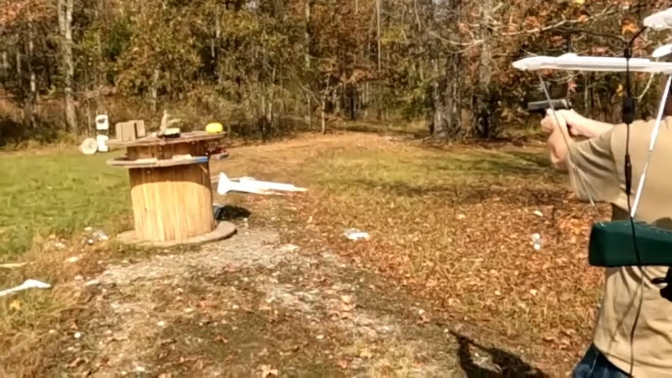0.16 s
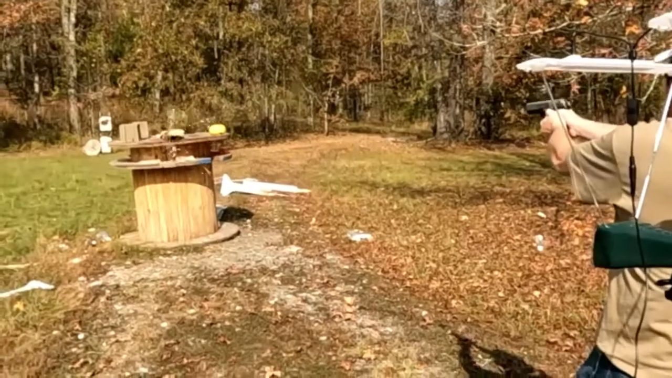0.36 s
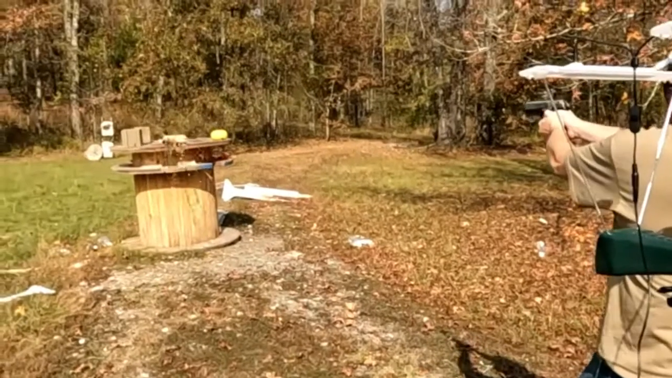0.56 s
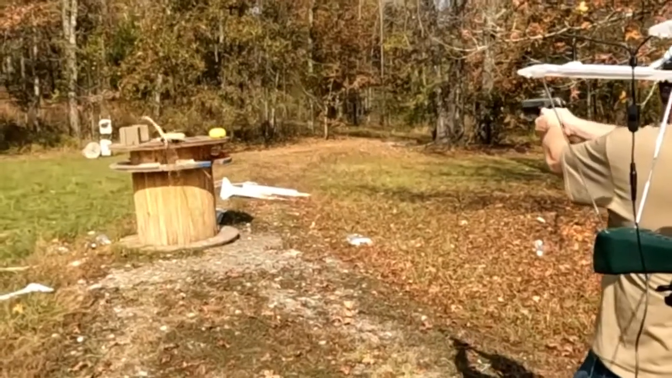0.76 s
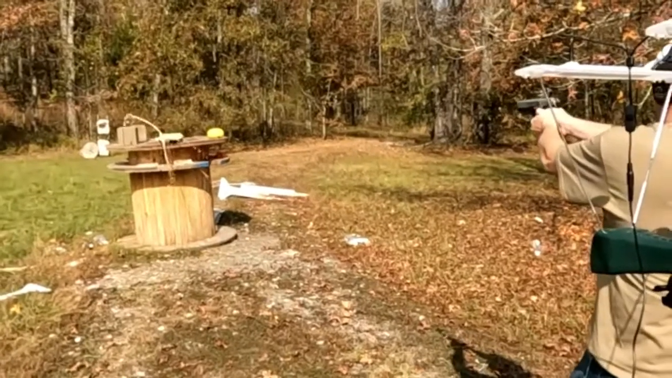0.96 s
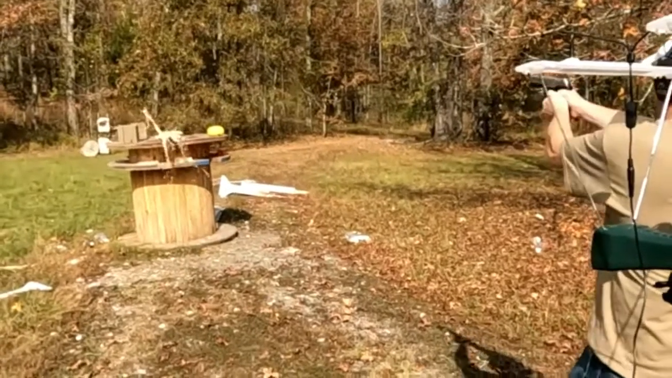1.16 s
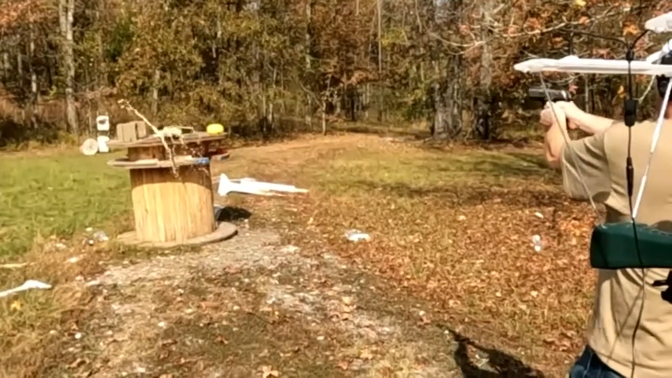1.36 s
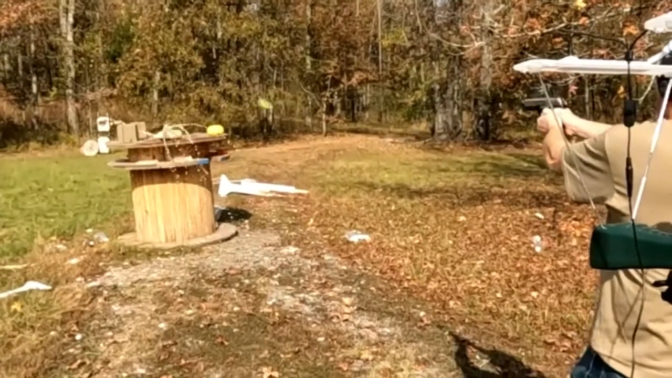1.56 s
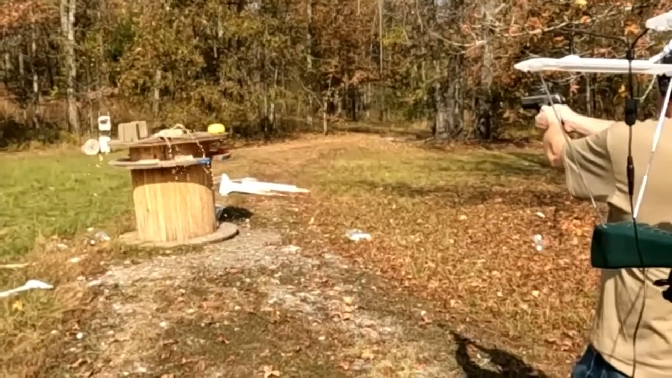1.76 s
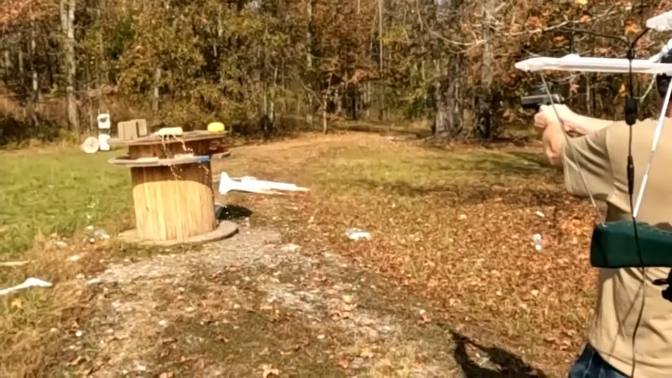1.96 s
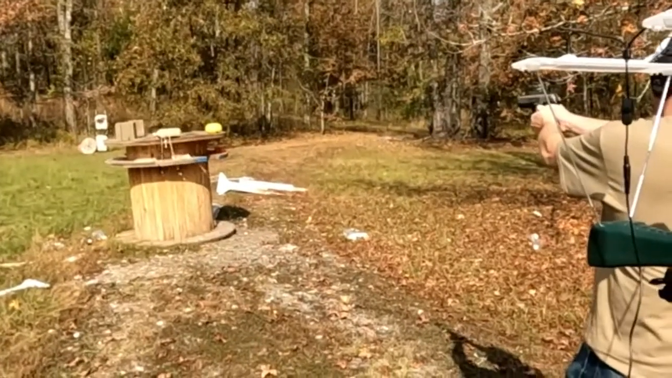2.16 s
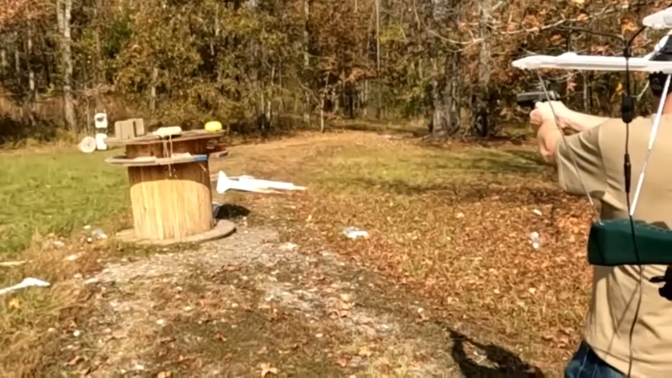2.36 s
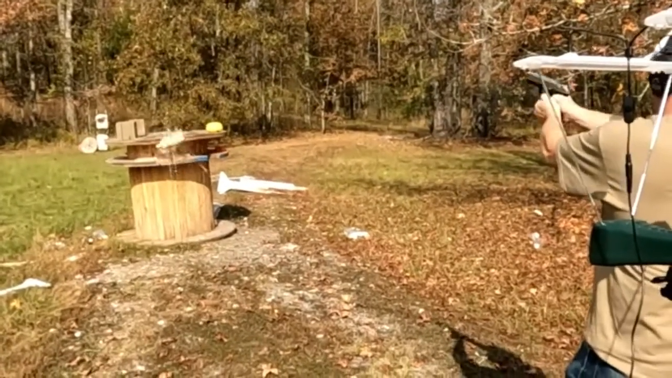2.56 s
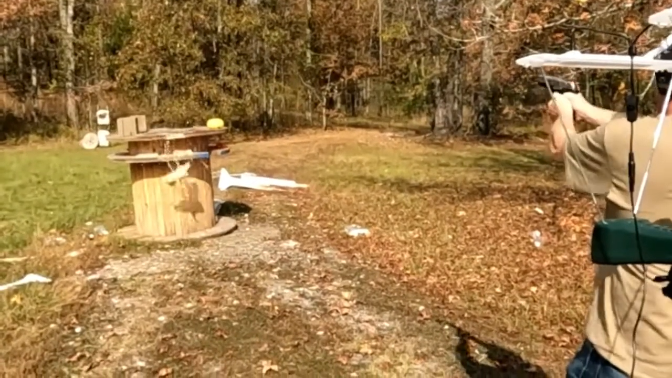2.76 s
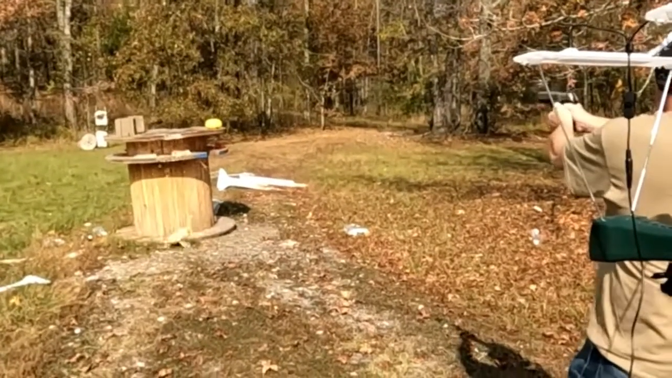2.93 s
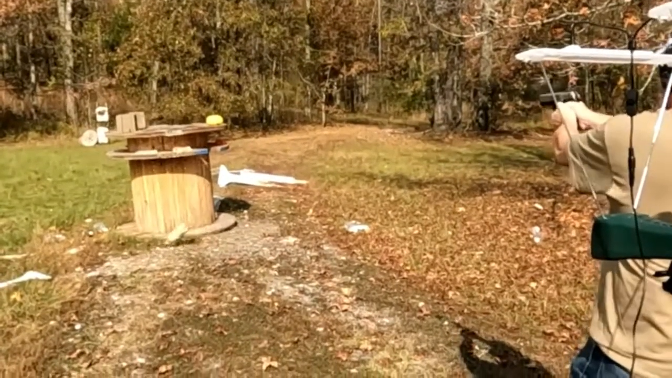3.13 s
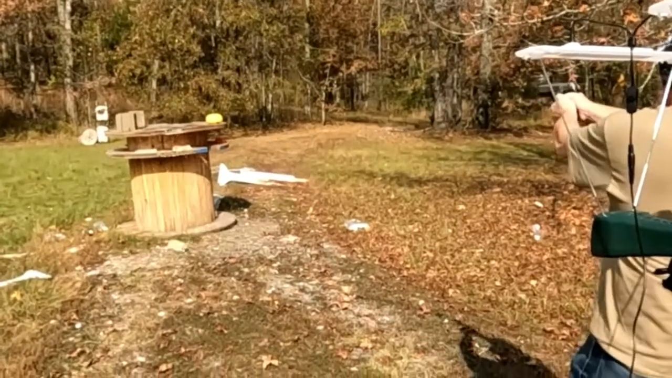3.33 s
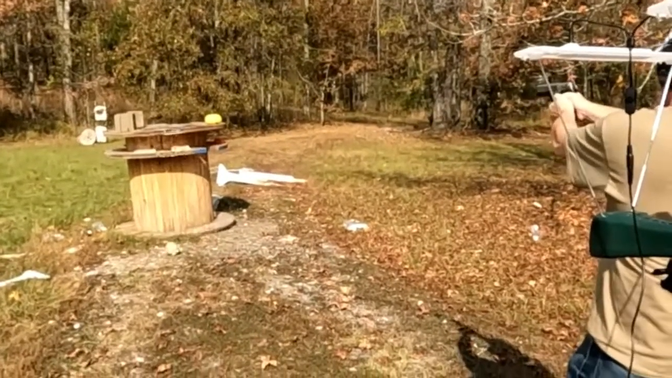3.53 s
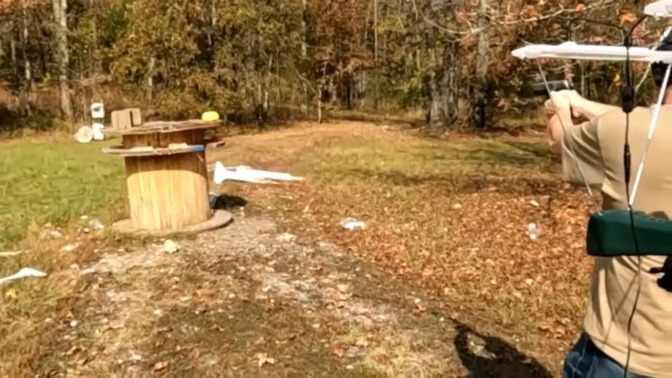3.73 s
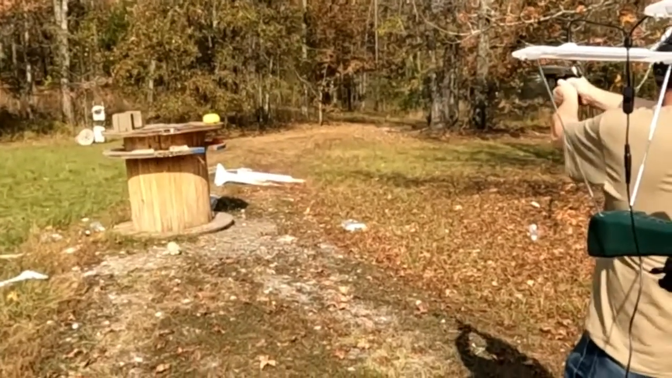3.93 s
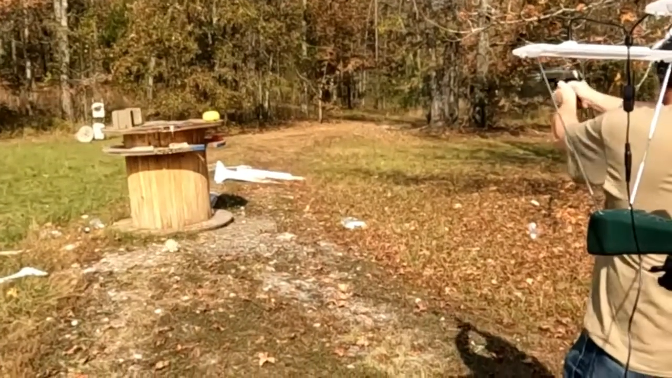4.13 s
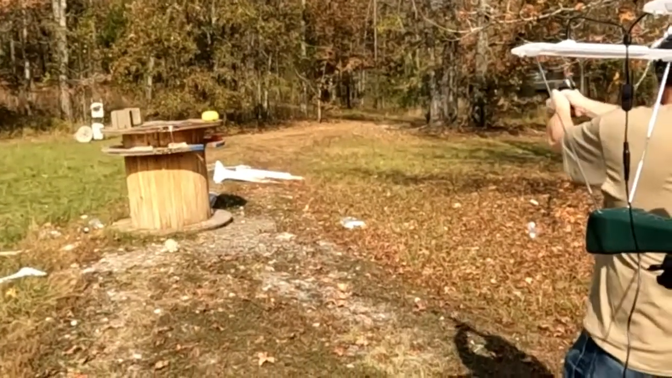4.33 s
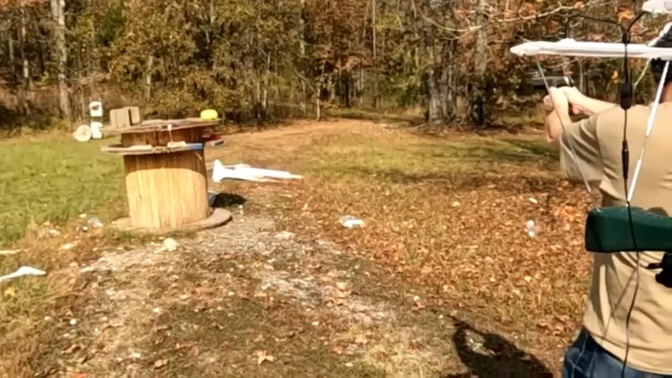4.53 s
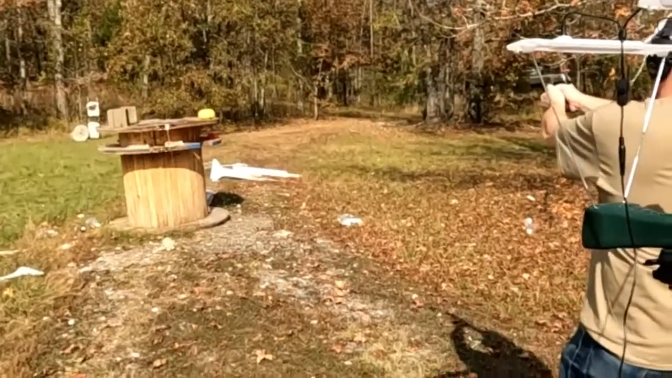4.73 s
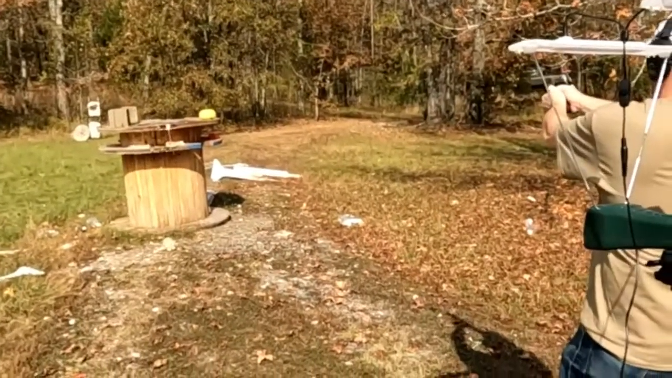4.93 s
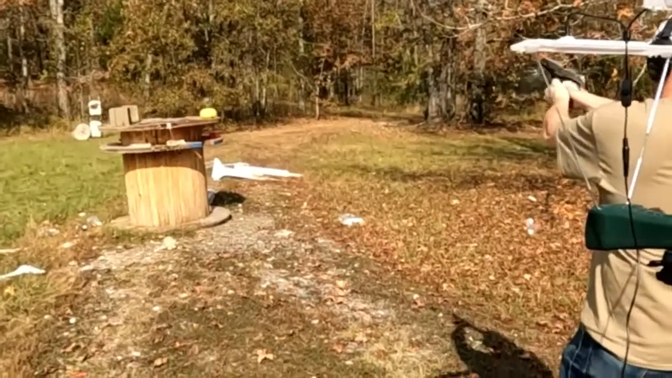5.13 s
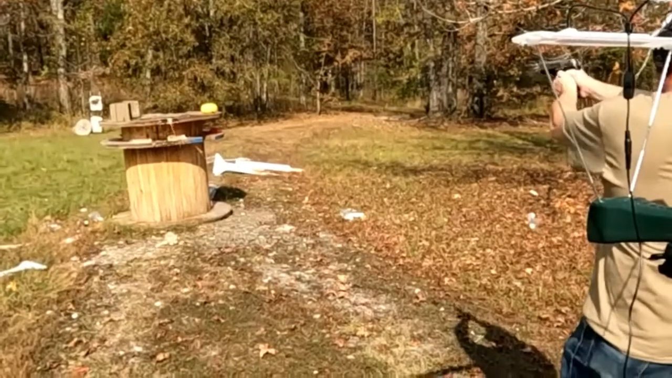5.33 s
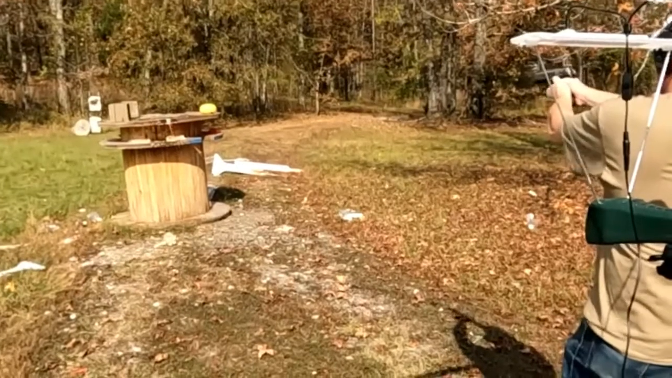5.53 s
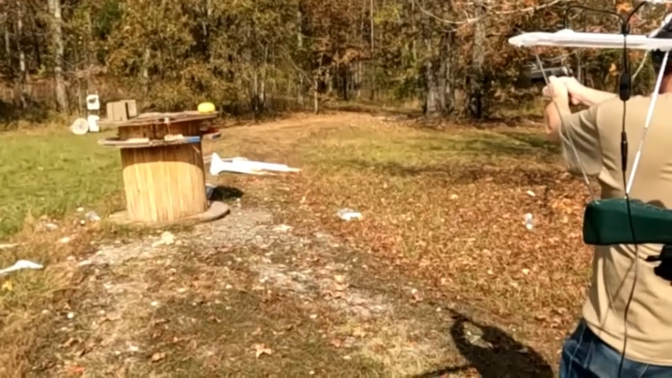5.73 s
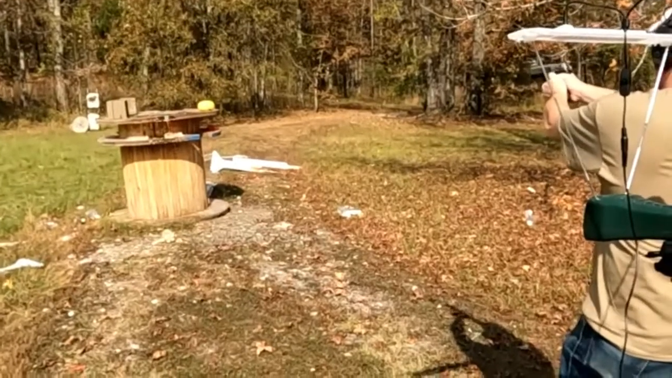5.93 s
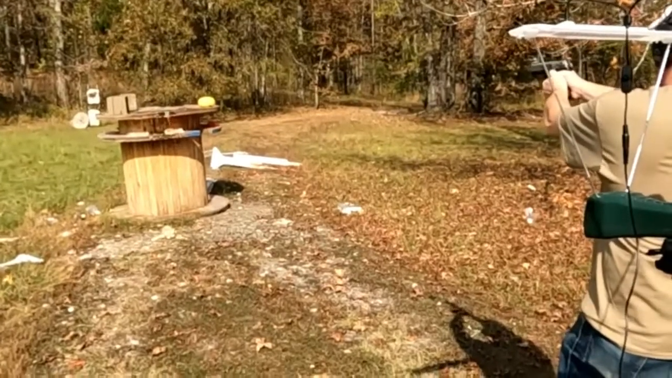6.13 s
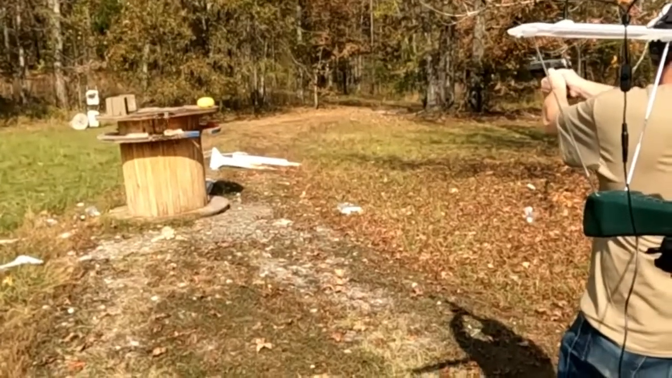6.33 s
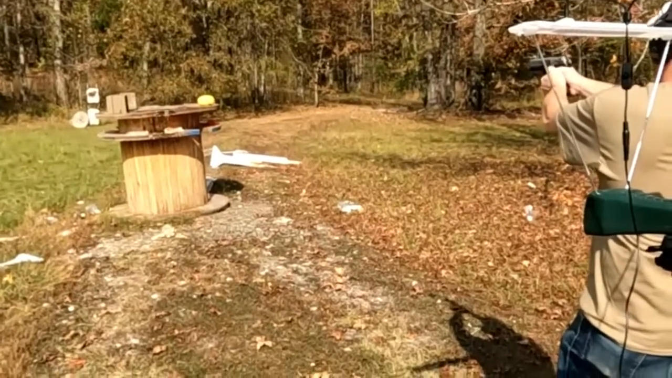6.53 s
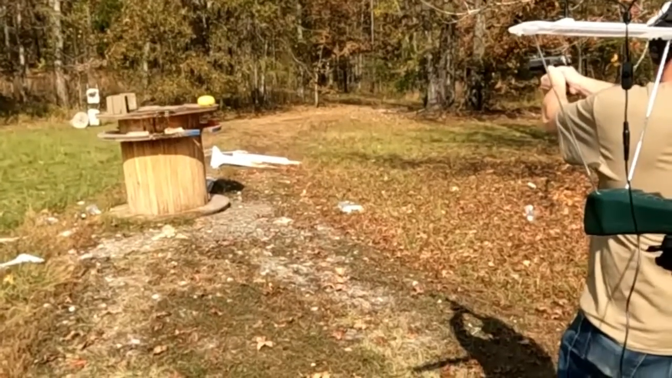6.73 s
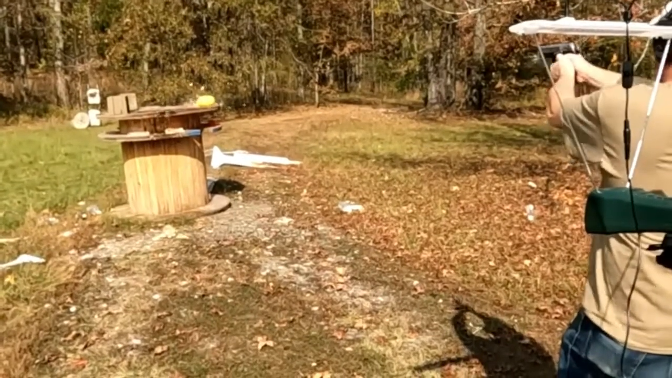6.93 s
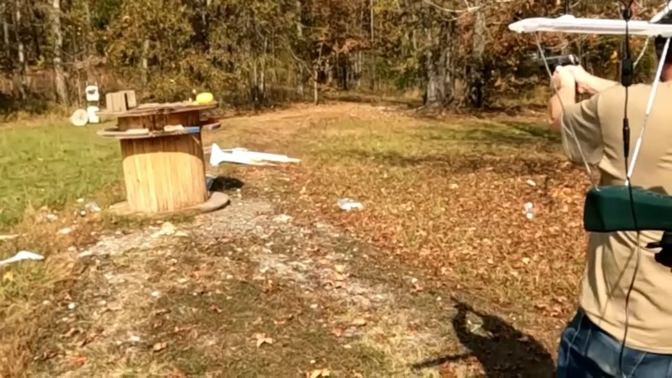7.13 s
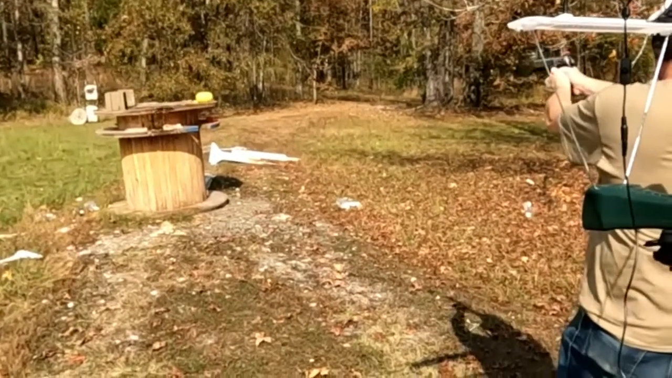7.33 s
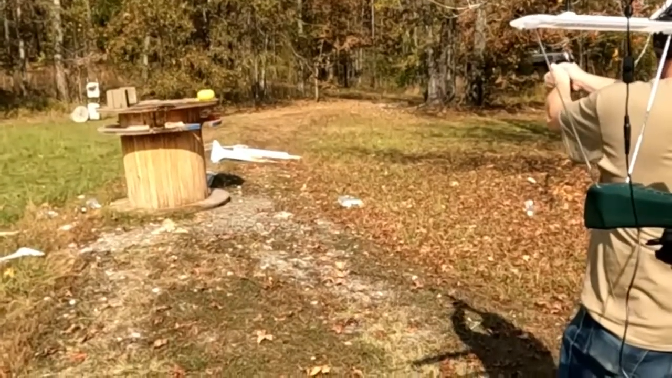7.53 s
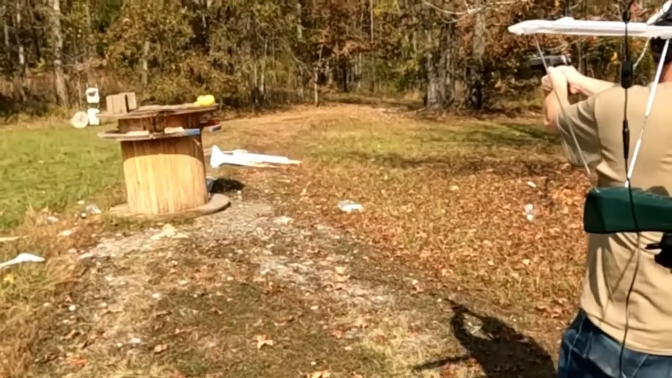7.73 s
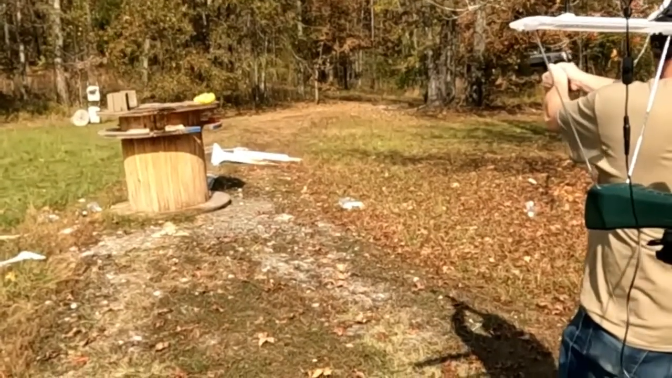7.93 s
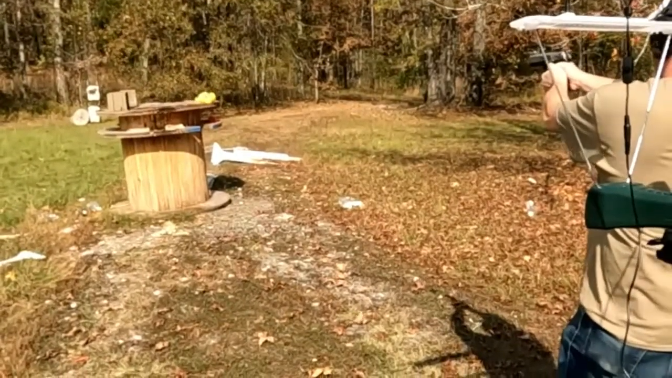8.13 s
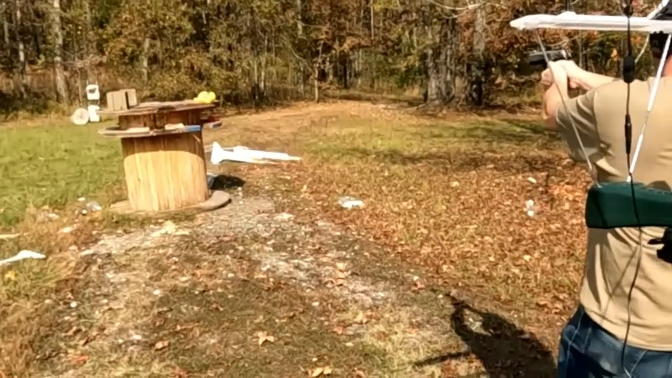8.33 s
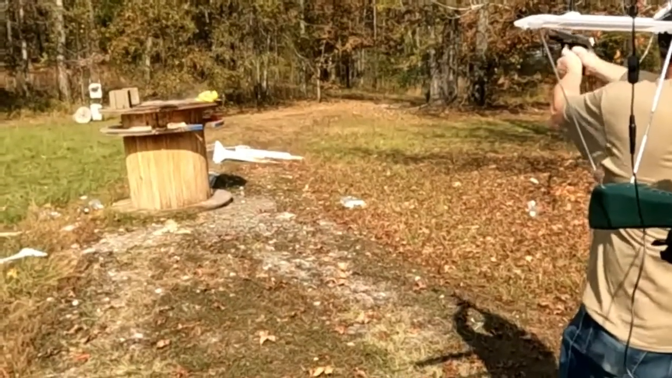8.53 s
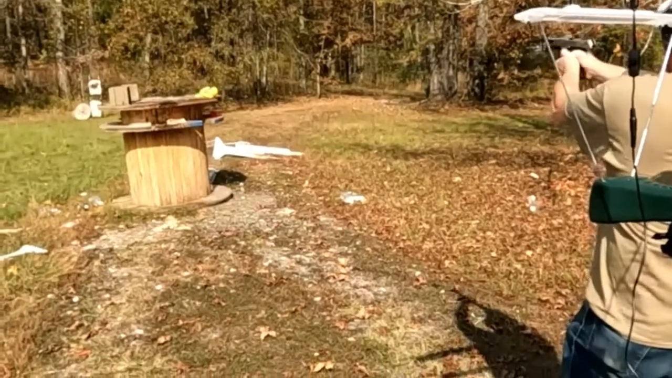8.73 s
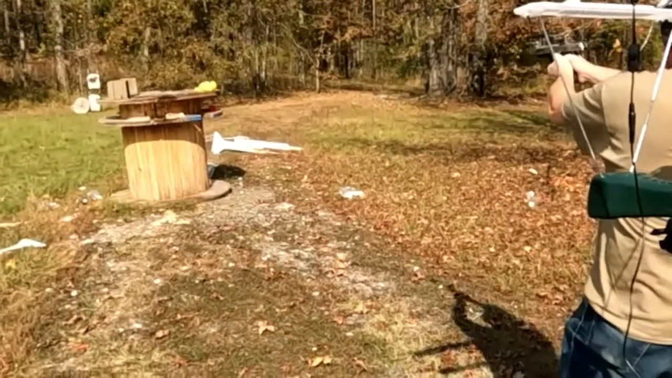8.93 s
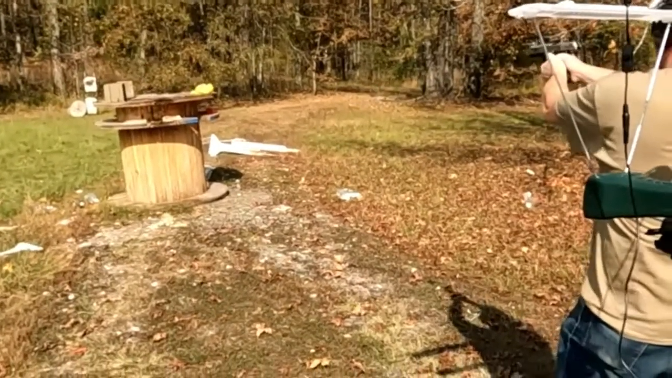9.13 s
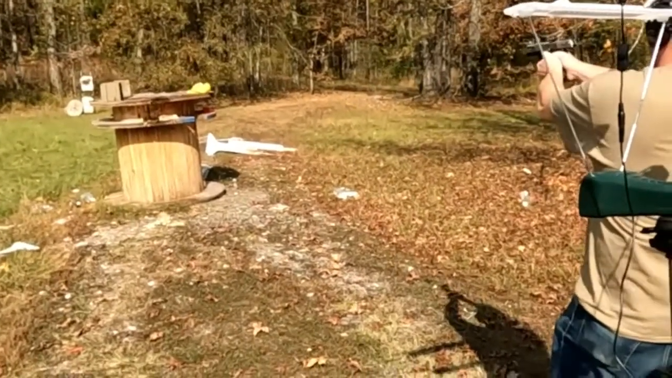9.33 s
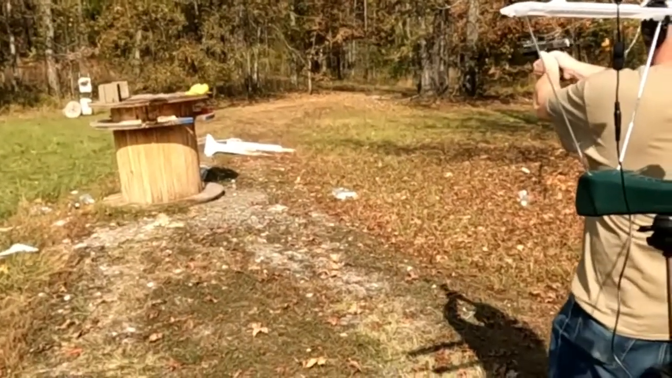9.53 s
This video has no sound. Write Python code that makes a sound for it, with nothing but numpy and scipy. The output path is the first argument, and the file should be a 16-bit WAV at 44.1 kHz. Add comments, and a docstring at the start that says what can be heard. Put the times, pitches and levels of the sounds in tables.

```python
"""The roll of an earlier shot is already fading in the woods; then a pistol fires six times at an easy pace.
It stands to the right of a two-port microphone on an outdoor range ringed by trees.
A buzzing noise and a tone swell up to each crack and low thump, which are causal pulses from spectra.
Delayed pulses give a near wooden spool and a sharp far slap; scattered noise taps give litter and woods.
Noise bursts tick and thud in the pauses, over shaped noise for hush, light wind, leaves and insects."""
import sys
import numpy as np
from scipy import signal
from scipy.fft import rfft, irfft, next_fast_len
from scipy.io import wavfile
from scipy.ndimage import uniform_filter1d

SR = 44100
rng = np.random.default_rng(int(sys.argv[2]) if len(sys.argv) > 2 else 0)


def digitize_waveform(pressure):
    """Quantize a signal to 16-bit integers and store it at the path in sys.argv[1].

    Rows of a 2-D input are taken as channels; values are limited to [-1, 1].
    """
    field = np.atleast_2d(pressure).T
    bounded = np.clip(field, -1, 1)
    quanta = np.round(bounded * 32767).astype(np.int16)
    wavfile.write(sys.argv[1], SR, quanta)


N = 423002


def amp(db):
    """Turns decibels into an amplitude factor."""
    return 10 ** (np.asarray(db) / 20)


def unit(x):
    """Scales x to rms 1."""
    return x / np.sqrt(np.mean(x ** 2) + 1e-20)


def spectrum(points, hz):
    """Amplitude at hz, interpolated in dB over log frequency."""
    f, db = np.transpose(points)
    return amp(np.interp(np.log(hz + 1), np.log(f), db))


def add(mix, s, sound):
    """Mixes a sound into both channels at time s, dropping what falls outside."""
    start = round(s * SR)
    sound = sound[..., max(-start, 0):]
    part = mix[:, max(start, 0):][:, :sound.shape[-1]]
    part += sound[..., :part.shape[1]]


def colour(x, points):
    """Filters x by a spectrum."""
    size = next_fast_len(len(x), True)
    gain = spectrum(points, np.fft.rfftfreq(size, 1 / SR))
    return irfft(rfft(x, size) * gain, size)[:len(x)]


def noise(size):
    """White noise of rms 1."""
    return rng.standard_normal(size)


def pulse(points, lag=0., knee_hz=400, size=8192):
    """A causal pressure pulse of peak 1 whose lows trail its highs by up to lag seconds."""
    hz = np.fft.rfftfreq(size, 1 / SR)
    log_gain = np.log(spectrum(points, abs(np.fft.fftfreq(size, 1 / SR))))
    # the Hilbert transform of the log gain gives the minimum phase
    response = np.exp(np.conj(signal.hilbert(log_gain)))[:len(hz)]
    trailing = np.exp(-2j * np.pi * lag * knee_hz * np.arctan(hz / knee_hz))
    wave = irfft(response * trailing)[:size // 2]
    return wave / abs(wave).max()


def step(t, rise_s):
    """A smooth rise from 0 to 1 around t = 0."""
    return .5 + .5 * np.tanh(t / rise_s)


def wander(size, span_s):
    """A random drift of rms 1 that changes over about span_s."""
    width = max(round(span_s * SR), 1)
    smoothed = uniform_filter1d(noise(size), width)
    return unit(uniform_filter1d(smoothed, width))


def bouts(rows, fade_s):
    """The level of a sound that fades in and out once for each row."""
    t = np.arange(N) / SR
    return sum(amp(db) * step(t - start, fade_s) * step(end - t, fade_s) for start, end, db in rows)


# spectrum of the distant air: (f/Hz, relative level/dB)
AIR = [(20, -74), (60, -85.5), (130, -90.5), (300, -106.5), (600, -95), (1000, -82.5), (2000, -101.5),
       (4000, -116.5), (7000, -121), (12000, -126), (16000, -140)]


def distant_hush():
    """Steady shaped noise from afar, independent in the two ports."""
    return np.array([colour(noise(N), AIR) for _ in range(2)]) * np.sqrt(SR)


WIND_DB, WIND_WANDER_DB = -56.5, 1.5
# gusts and lulls: (middle t/s, half length t/s, change of level/dB)
GUSTS = [(.95, .25, 3), (1.8, .42, -24), (3.35, .15, -8), (4.45, 0.24, -9.5), (5.048, 0.21, 11),
         (6.8, 0.2, 8.5), (7.95, 0.18, 7.5), (9.4, 0.27, 10.5)]


def wind():
    """Light wind rumbles on the microphone, the same in both ports, rising in gusts and sinking in lulls."""
    t = np.arange(N) / SR
    band = [(10, -9.5), (30, -0.5), (60, -7.0), (130, -14.0), (400, -41.5), (2000, -91.0)]
    rumble = unit(colour(noise(N), band))
    gust_db = sum(db * np.exp(-((t - s) / half) ** 2) for s, half, db in GUSTS)
    return rumble * amp(WIND_DB + WIND_WANDER_DB * wander(N, span_s=0.11) + gust_db)


LEAVES_DB, LEAVES_FADE_S = -89, .12
# dry leaves stir: (from t/s, to t/s, level/dB)
RUSTLES = [(.3, 1.2, -66), (.95, 1.2, -61), (2.3, 2.7, -72.5), (6.15, 6.9, -70.5)]


def dry_leaves(grains_per_s=6000):
    """Sparse random clicks of uneven size make the fine crackle of leaves."""
    sizes = amp(3 * np.minimum(rng.exponential(1, (2, N)), 5))
    present = rng.random((2, N)) < grains_per_s / SR
    grains = noise((2, N)) * sizes * present
    band = [(1500, 0.0), (4000, -0.5), (7000, -5.5), (9000, -9.5), (12500, -9), (15000, -32.5)]
    crackle = np.array([unit(colour(g, band)) for g in grains])
    return crackle * (amp(LEAVES_DB) + bouts(RUSTLES, LEAVES_FADE_S))


INSECT_DB, TRILL_FADE_S, TRILL_HZ = -92, .16, 68
# trills of an insect: (from t/s, to t/s, level/dB)
TRILLS = [(.8, 1.45, -71), (2.0, 2.95, -79), (4.95, 5.9, -85), (6.0, 7.15, -79.5), (9.35, 9.8, -86)]
# runs of chirps from a second insect: (from t/s, to t/s)
CHIRP_RUNS = [(3.34, 3.85), (7.48, 8.35)]


def insects(chirps_per_s=10, chirp_db=-75):
    """High narrow-band noise pulses in a thin trill; a second insect gives short runs of chirps."""
    t = np.arange(N) / SR
    pulsing = 1 + .5 * np.sin(2 * np.pi * TRILL_HZ * t)
    level = (amp(INSECT_DB) + bouts(TRILLS, TRILL_FADE_S)) * pulsing
    for start, end in CHIRP_RUNS:
        for s in np.arange(start, end, 1 / chirps_per_s):
            late = rng.uniform(-0.022, .02)
            loudness = amp(chirp_db + 3 * rng.standard_normal())
            level += loudness * np.exp(-((t - s - late) / 0.0027) ** 2)
    band = [(8000, -49.5), (11000, -13.5), (12500, 3.5), (13500, -5.5), (15000, -47.5)]
    return level * np.array([unit(colour(noise(N), band)) for _ in range(2)])


# light ticks of the action, cases and gear: (t/s, relative peak level/dB, centre f/Hz, decay t/s)
TICKS = [(0.486, -40.5, 6860, 0.0039), (.6524, -59, 7500, .003), (1.0956, -32, 2410, 0.0024),
         (1.1053, -23, 1900, .0025), (1.4421, -45, 5500, .003), (3.12, -57.5, 5500, .004),
         (3.4969, -61, 6000, .004), (4.253, -35, 5000, .003), (4.89, -58, 5200, .006),
         (6.199, -61, 5000, .007), (6.232, -58, 4830, .008), (7.849, -47.5, 5300, 0.013),
         (8.3754, -60, 5500, .004)]


def ticks():
    """Each bright tick is a decaying burst of band noise with a short rustle after it."""
    out, t = np.zeros((2, N)), np.arange(SR // 5) / SR
    rustle = amp(-22) * np.exp(-t / .03)
    for s, db, hz, decay in TICKS:
        band = [(hz / 4, -30), (hz * .7, -8), (hz, 0), (hz * 1.4, -12), (13000, -25), (16000, -55)]
        tick = colour(noise(len(t)), band) * (np.exp(-t / decay) + rustle)
        add(out, s, amp(db + 2.5) * tick / abs(tick).max())
    return out


# soft thuds on the ground: (t/s, peak level/dB)
THUDS = [(3.126, -29), (3.5, -37.5)]


def thuds(decay_s=0.023):
    """Dull low noise swells and dies away around each thud."""
    out, t = np.zeros((2, N)), np.arange(SR // 5) / SR
    band = [(30, 4), (110, 10), (250, -8), (900, -56)]
    for s, db in THUDS:
        thud = colour(noise(len(t)), band) * t * np.exp(-t / decay_s)
        add(out, s - decay_s, amp(db) * thud / abs(thud).max())
    return out


def scatter(taps, points, level, air_db=2.33, air_power=1.409):
    """Echoes from one kind of surface; the air takes more treble the longer the path."""
    hz, when, z = signal.stft(unit(colour(taps, points)) * level, SR, nperseg=256)
    loss_db = air_db * (hz[:, None] / 1000) ** air_power * when
    return signal.istft(z * amp(-loss_db), SR, nperseg=256)[1][:len(taps)]


ECHO_LENGTH = int(2.4 * SR)


def reflectors(spread_db=2.0, per_s=16000):
    """Countless small reflections, a few of them stronger."""
    sizes = amp(spread_db * np.minimum(rng.exponential(1, ECHO_LENGTH), 4))
    return noise(ECHO_LENGTH) * sizes * (rng.random(ECHO_LENGTH) < per_s / SR)


EDGE_DELAY_S, EDGE_RISE_S, EDGE_HOLD_S, EDGE_POWER, EDGE_DB = 0.1202, 0.0074, .17, 2.84, -28.5
# spectrum of the edge of the woods: (f/Hz, relative level/dB)
EDGE = [(30, -28), (100, -7.5), (180, 7.5), (320, -15.5), (550, -7.5), (1000, -17), (2000, -23),
        (4000, -24), (6500, -29), (9500, -37), (13000, -42), (16000, -60)]


def woods_edge(taps):
    """The edge, some 20 m off, answers as one wall; its echo holds briefly, then falls as a power of time."""
    t = np.arange(1, ECHO_LENGTH + 1) / SR
    fall = np.minimum(EDGE_HOLD_S / t, 1) ** EDGE_POWER
    return scatter(taps, EDGE, amp(EDGE_DB) * step(t - EDGE_DELAY_S, EDGE_RISE_S) * fall)


WOODS_DELAY_S, WOODS_RISE_S, WOODS_PEAK_S, WOODS_DB = 0.12, 0.01, .28, -25
WOODS_GROWTH_POWER, WOODS_FALL_POWER, WOODS_END_S = 1, 1.484, 2.1
# the far slap comes off a rough face that thickens the echo around it
FACE_S, FACE_SPREAD_S, FACE_DB = .292, 0.0049, 3
# spectrum of the trunks: (f/Hz, relative level/dB)
WOODS = [(40, -27), (100, -5), (210, -16), (330, -12), (540, 2.5), (1050, 4.5), (1450, -2), (2100, -6),
         (3800, -13), (6500, -20), (9500, -26.5), (13000, -29.5), (16000, -48)]


def deep_woods(taps):
    """Trunks answer more and more up to the thick of the woods, then less with distance."""
    t = np.arange(1, ECHO_LENGTH + 1) / SR
    depth = t / WOODS_PEAK_S
    level = amp(WOODS_DB) * np.minimum(depth ** WOODS_GROWTH_POWER, depth ** -WOODS_FALL_POWER)
    level *= amp(FACE_DB * np.exp(-((t - FACE_S) / FACE_SPREAD_S) ** 2))
    level *= step(t - WOODS_DELAY_S, WOODS_RISE_S) * step(WOODS_END_S - t, rise_s=.22)
    return scatter(taps, WOODS, level)


def echoes(taps):
    """The edge of the woods answers, then the trunks deep inside."""
    return woods_edge(taps) + deep_woods(taps)


LEFT_LEAN = .22  # the woods answer a little more from the left
CLUMP_DB, CLUMP_S = 0.87, 0.0086  # trees stand in clumps, so their echo is lumpy
# side share of the woods' echo: (f/Hz, level/dB)
DIFFUSE = [(50, -31.5), (250, -22.5), (800, -8), (2000, -4), (8000, -5)]


def woods_roll(trees, clumps, across):
    """The trees stay put from shot to shot, but moving air scrambles the longer paths."""
    steady = np.exp(-np.arange(ECHO_LENGTH) / SR / 0.71)
    roll = echoes(clumps * (steady * trees + np.sqrt(1 - steady ** 2) * reflectors()))
    side = colour(across + LEFT_LEAN * roll, DIFFUSE)
    return np.array([roll + side, roll - side])


# dull returns of the thump from the bank and the tree line: (t/s after the shot, relative level/dB)
BOOMS = [(.103, -27.5), (.291, -24)]


def add_booms(out, s, echo_db):
    """Only the lows of the thump come back."""
    band = [(30, -24), (100, -6), (180, -1), (400, -15.5), (1200, -50), (8000, -82)]
    boom = pulse(band, lag=0.0037, knee_hz=500)
    for delay, db in BOOMS:
        add(out, s + delay, amp(db + echo_db) * boom)


# large trunks and walls that answer every shot: (t/s after the shot, peak level/dB)
SLAPS = [(0.1225, -24), (0.1526, -22.5), (0.2567, -17), (0.2667, -28), (.2931, -9), (0.337, -24)]


def add_slaps(out, s):
    """Sharp single reflections, the strongest from some 50 m off."""
    band = [(150, -9), (600, 11.5), (1300, 21), (2200, 0), (4000, -5.5), (8000, -27), (15000, -85)]
    slap = pulse(band, lag=0.0009, knee_hz=1550)
    for delay, db in SLAPS:
        add(out, s + delay, -amp(db) * slap)


# spectrum of the wooden spool's reflection: (f/Hz, relative level/dB)
SPOOL = [(30, -18), (100, -7.5), (205, 7), (330, -12), (520, -5), (1100, -7), (2000, -30.5), (5000, -37.5),
         (15000, -64.5)]


def add_spool(out, s, thump_db):
    """The spool, some 5 m off, returns the blast directly and again by way of the ground."""
    spool = pulse(SPOOL, lag=.003, knee_hz=931)
    add(out, s + .0298, amp(thump_db - 13.5) * spool)
    add(out, s + .0348, amp(thump_db - 18.0) * spool)


# spectrum of the leaf litter: (f/Hz, relative level/dB)
LITTER = [(40, -1), (190, 3.5), (330, -2.5), (560, 0), (1000, -2), (2000, -7), (4000, -10.5), (6500, -14.5),
          (9500, -23.5), (13000, -27.5), (16000, -35)]
# litter near the muzzle, on the wider ground, behind the spool:
# (t/s after the shot, relative level/dB, fall/dB per s)
LITTER_PATCHES = [(.002, -16.5, 1049.5), (.012, -33, 130), (0.033, -25, 479.5)]


def litter(side_db=-14, size=16384):
    """Leaves on the ground scatter the blast first, in a fine wash."""
    t = np.arange(size) / SR
    power = sum((t > s) * amp(db - fall * abs(t - s)) ** 2 for s, db, fall in LITTER_PATCHES)
    mid, side = (scatter(noise(size), LITTER, np.sqrt(power)) for _ in range(2))
    return np.array([mid + amp(side_db) * side, mid - amp(side_db) * side])


def buffet(db=-15, decay_s=.008):
    """The blast shakes the two microphone ports against each other for a moment."""
    t = np.arange(SR // 10) / SR
    band = [(25, -3.5), (150, 2.5), (350, -5), (800, 1.5), (2000, -14), (6000, -35)]
    shake = unit(colour(noise(len(t)), band))
    return np.array([[1], [-1]]) * amp(db) * shake * np.exp(-t / decay_s)


# a quick attack, a slow swell up to the crack, a quick release
BUZZ_LEAD_S, BUZZ_FULL_S, BUZZ_END_S = .046, 0.024, 0.011
BUZZ_ATTACK_DB_PER_S, BUZZ_SWELL_DB_PER_S, BUZZ_RELEASE_DB_PER_S = 1549.5, 270.5, 3600
SHRILL_DB, SHRILL_WIDTH_HZ = 4.5, 420
# spectrum of the buzzing noise: (f/Hz, relative level/dB)
BUZZ = [(25, -14.5), (90, -16), (190, -3.5), (340, -19), (560, 0), (1000, 2.5), (1500, 0.5), (2000, -6.5),
        (3800, -14), (7000, -13), (9000, -27.5), (12500, -31), (15500, -49.5)]


def buzzing_swell(buzz_db, thump_db, tone_db, tone_hz, shrill_hz):
    """Repeating noise swells ahead of the crack, then dies quickly; returns its start time too."""
    period_s, repeat_share, uneven_db = .00533, .84, 2.6
    t = np.arange(-BUZZ_LEAD_S, BUZZ_END_S, 1 / SR)
    swell_db = (BUZZ_SWELL_DB_PER_S * t + BUZZ_ATTACK_DB_PER_S * np.minimum(t + BUZZ_FULL_S, 0)
                - BUZZ_RELEASE_DB_PER_S * np.maximum(t, 0))
    repeating = np.resize(noise(round(period_s * SR * rng.uniform(0.92, 1.05))), len(t))
    buzz = np.sqrt(repeat_share) * repeating + np.sqrt(1 - repeat_share) * noise(len(t))
    # above the middle range some bands stick out, different ones each time, and one is shrill
    bands = []
    for hz in np.arange(1000, 16000, 350):
        uneven = uneven_db * rng.standard_normal() * (hz > 1500)
        shrill = SHRILL_DB * np.exp(-((hz - shrill_hz) / SHRILL_WIDTH_HZ) ** 2)
        bands.append((hz, uneven + shrill))
    buzz = unit(colour(colour(buzz, bands), BUZZ))
    # a rough tone and the low end only come in towards the crack
    tone = np.sin(2 * np.pi * tone_hz * t) * np.exp(-(t / .023) ** 2)
    tone *= 1 + .3 * unit(colour(noise(len(t)), [(100, 0), (400, -6), (2000, -40)]))
    low_band = [(25, -5), (90, -9), (180, -1), (330, -9), (520, -5), (1200, -44)]
    growl = unit(colour(noise(len(t)), low_band)) * np.exp(-abs(t) / 0.0094)
    layers = amp(buzz_db - 12) * buzz + amp(thump_db - 16.0) * growl + amp(tone_db - 10.0) * tone
    return t[0], amp(swell_db) * layers


# spectra of the muzzle blast's sharp and low parts: (f/Hz, relative level/dB)
CRACK = [(150, -31), (500, -13.5), (900, 10), (1600, 3.5), (3000, -1.5), (5000, -15), (7000, -12),
         (9000, -24), (13000, -49.5), (16000, -57)]
THUMP = [(20, -10.5), (50, -8.5), (95, -7), (165, 3), (240, 2.5), (330, -4), (520, 0.5), (900, -19.5),
         (2500, -36.5), (10000, -72)]


def add_blast(out, s, blast_db, thump_db):
    """The muzzle's pressure pulse, its bounce off the ground and the low thump."""
    crack = pulse(CRACK, lag=0.002383, knee_hz=1085)
    add(out, s, -amp(blast_db - 4.5) * crack)
    add(out, s + .0041, amp(.5 * thump_db - 13) * crack)  # off the ground
    add(out, s, amp(thump_db - 4.5) * pulse(THUMP, lag=0.005, knee_hz=527))


# one row a shot; of the earliest only the echo is left. All levels are relative: (t/s, blast level/dB,
# thump level/dB, buzz level/dB, level/dB and f/Hz of the tone in the swell, shrill band f/Hz, echo level/dB)
SHOTS = [(-.38, 0, -1.5, -49, -50, 800, 6500, -1.6), (1.1167, 1.5, -4, -19, -1, 900, 6900, -3),
         (2.6491, -0.5, 3.5, -1, -3, 785, 6800, 0), (3.923, -1, 3.5, -1, -5, 1090, 7000, 0),
         (5.2468, -2.5, 2.5, -0.5, -8, 610, 5200, 0), (6.9200, -1, 3.5, 0.5, -3.5, 647, 5900, 0.5),
         (8.4652, -1.5, 3.5, 1, -9, 796, 6100, 0.5)]


def pistol(port_lag_s=.00007):
    """A buzzing noise swells up to each shot's crack and thump, then litter, spool, trunks and woods answer."""
    out = np.zeros((2, N))
    trees, across = reflectors(), echoes(reflectors())
    clumps = amp(CLUMP_DB * wander(ECHO_LENGTH, CLUMP_S))
    for s, blast_db, thump_db, buzz_db, tone_db, tone_hz, shrill_hz, echo_db in SHOTS:
        lead, swell = buzzing_swell(buzz_db, thump_db, tone_db, tone_hz, shrill_hz)
        add(out, s + lead, swell)
        add(out, s, buffet())
        add_blast(out, s, blast_db, thump_db)
        add_spool(out, s, thump_db)
        add(out, s, amp(thump_db - 2) * litter())
        add_slaps(out, s)
        add_booms(out, s, echo_db)
        add(out, s, amp(echo_db) * woods_roll(trees, clumps, across))
    # the shooter stands to the right, so the left port hears the shots a little later
    mid, shift = out.mean(0), max(round(port_lag_s * SR / 2), 1)
    skew = (np.roll(mid, shift) - np.roll(mid, -shift)) / 3
    return out + np.array([skew, -skew])


NARROW_FROM_S, NARROW_S, NARROW_POWER = 1.02, 1, 1.74
# what stays of the side signal once the image has closed: (f/Hz, level/dB)
STAYS_WIDE = [(1000, -69), (3000, -42), (7500, -23.5), (10500, -11), (12000, 1), (16000, -0.5)]
# the right port is duller at the very top: (f/Hz, level/dB)
RIGHT_PORT = [(9000, 0), (12000, -3.5), (16000, -6)]


def scene():
    """The image starts wide and closes to mono around the first full shot; only the top treble stays wide."""
    left, right = pistol() + ticks() + thuds() + distant_hush() + wind() + dry_leaves() + insects()
    closing = (np.arange(N) / SR - NARROW_FROM_S) / NARROW_S
    width = np.clip(1 - closing, 0, 1) ** NARROW_POWER
    mid, side = (left + right) / 2, (left - right) / 2
    side = width * side + (1 - width) * colour(side, STAYS_WIDE)
    return np.array([mid + side, colour(mid - side, RIGHT_PORT)])


CUTOFF_HZ = 15500


def record(dry):
    """The loudest peaks round off at full scale; then a low-pass limits the band."""
    limited = dry / (1 + dry ** 10) ** (1 / 10)
    low_pass = signal.firwin(511, CUTOFF_HZ, window=("kaiser", 9), fs=SR)
    return signal.oaconvolve(limited, low_pass[None], "same")


dry = scene()
out = record(dry)
digitize_waveform(out)
```